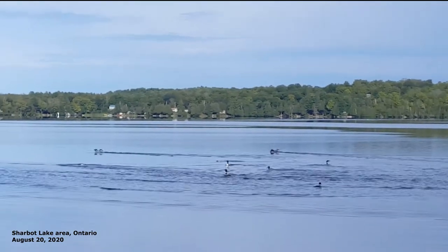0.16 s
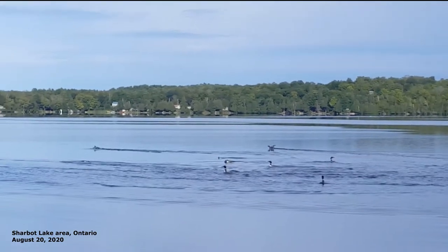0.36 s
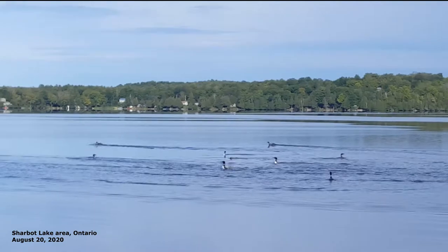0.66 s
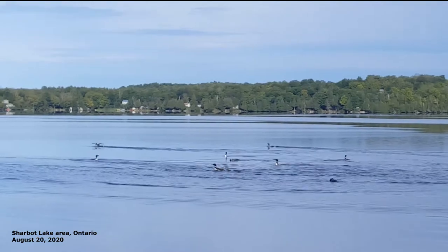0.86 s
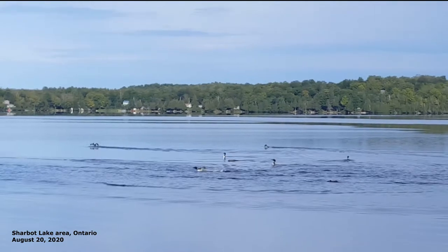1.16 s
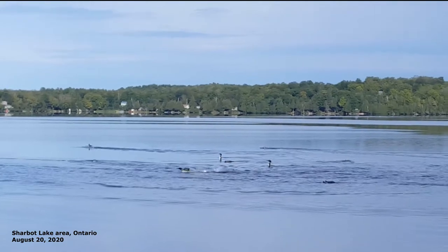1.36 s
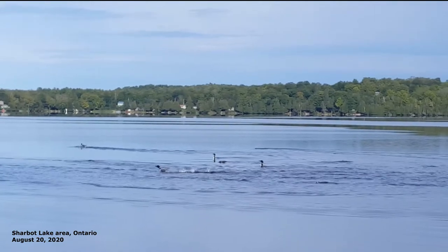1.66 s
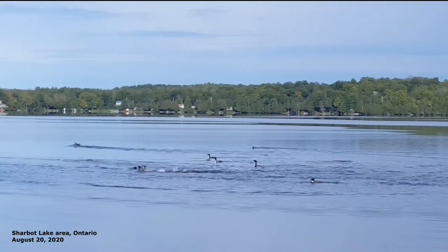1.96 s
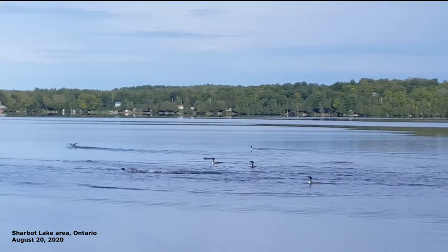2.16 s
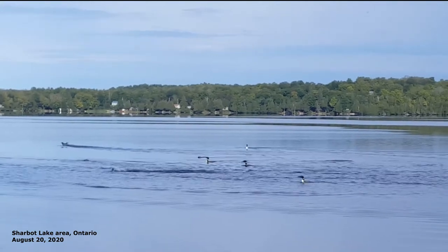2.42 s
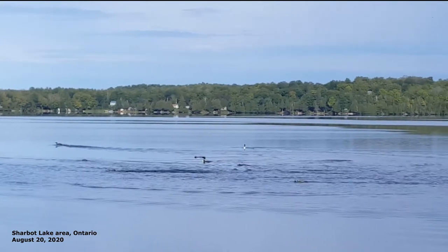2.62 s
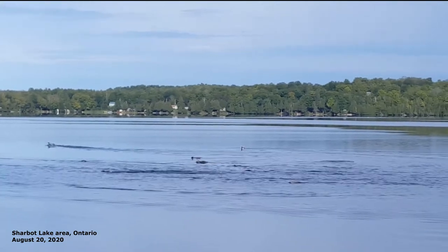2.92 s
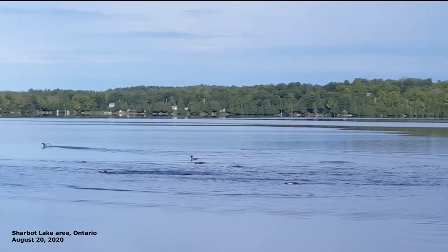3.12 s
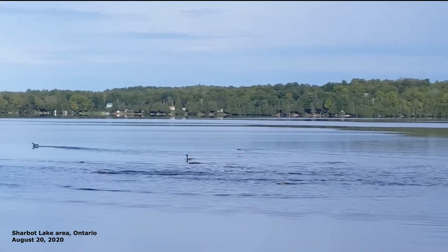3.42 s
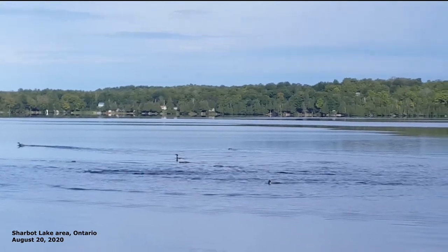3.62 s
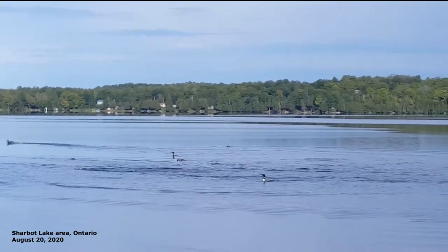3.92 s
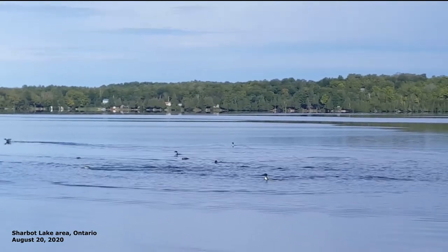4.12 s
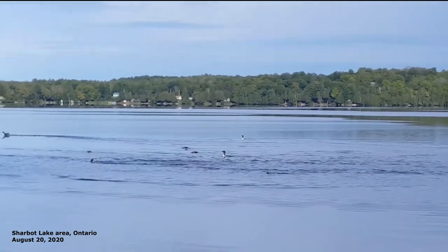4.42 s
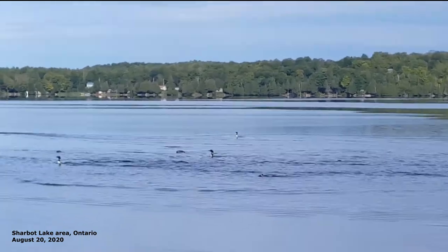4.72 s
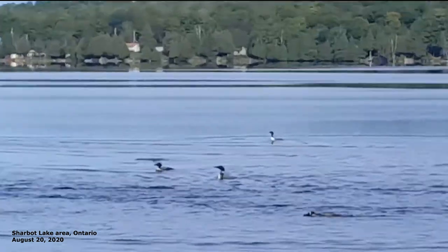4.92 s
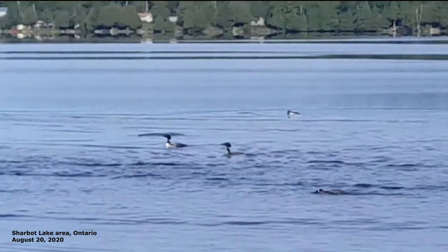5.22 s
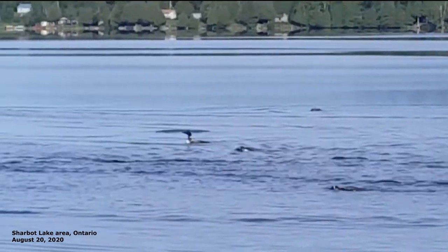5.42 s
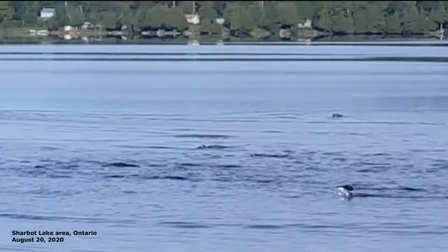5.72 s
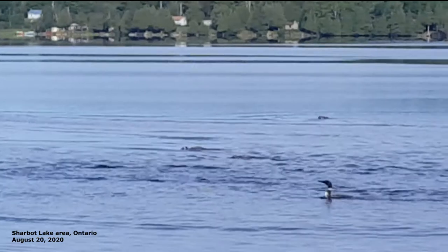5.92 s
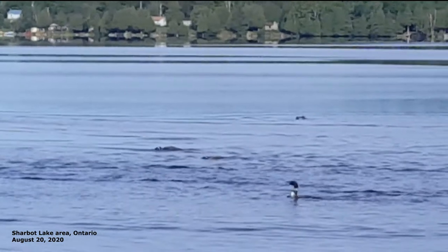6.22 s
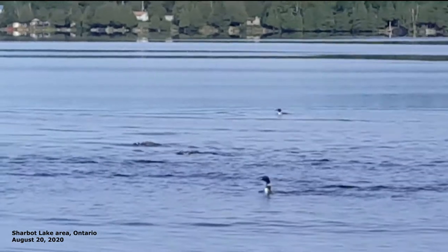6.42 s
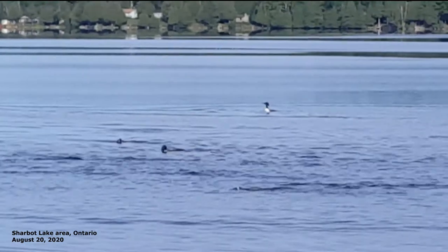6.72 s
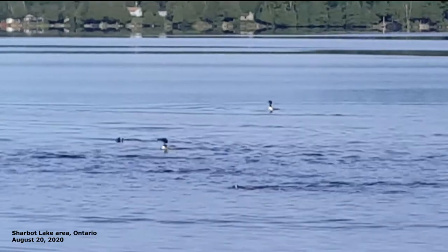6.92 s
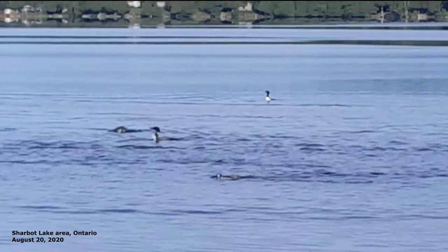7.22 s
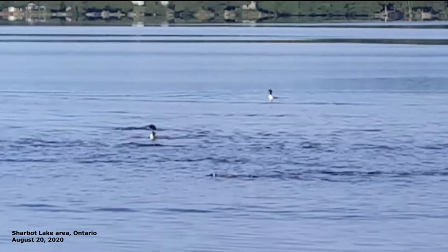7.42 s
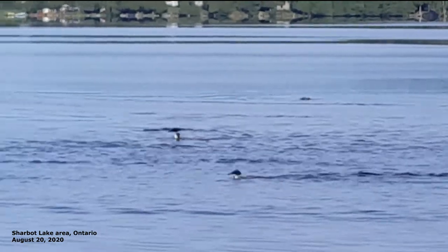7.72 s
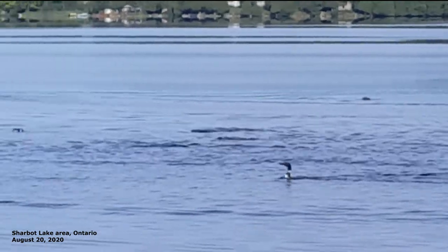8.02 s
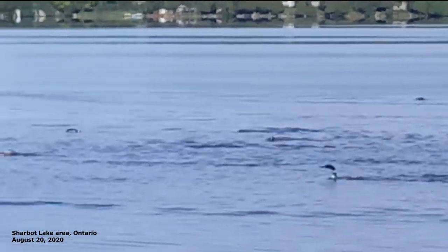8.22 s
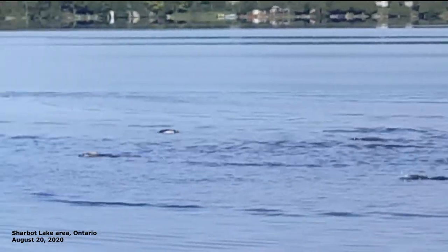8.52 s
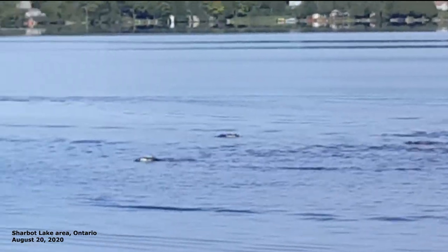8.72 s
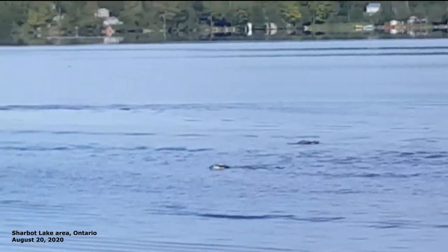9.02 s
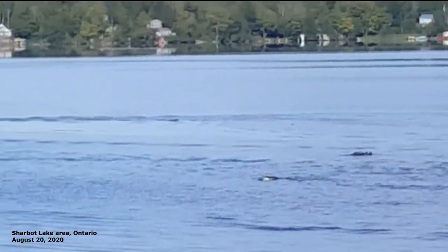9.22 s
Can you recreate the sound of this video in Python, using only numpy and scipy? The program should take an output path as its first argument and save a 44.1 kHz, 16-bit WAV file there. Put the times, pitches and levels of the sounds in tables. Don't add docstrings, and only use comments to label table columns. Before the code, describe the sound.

A group of loons trades rapid, yodel-like tremolo calls over open water, with short dark echoes, two small cloth ticks and a faint distant engine.

```python
import sys
import numpy as np
from scipy import signal
from scipy.fft import rfft, irfft, next_fast_len
from scipy.io import wavfile
from scipy.ndimage import uniform_filter1d, map_coordinates

SR = 44100
rng = np.random.default_rng(int(sys.argv[2]) if len(sys.argv) > 2 else 0)


def unload_wav(signal):
    wavfile.write(
        sys.argv[1],
        SR,
        np.round(np.clip(np.atleast_2d(signal).T, -1, 1) * 32767).astype(np.int16),
    )


def voltage_ratio(level):
    return 10 ** (np.asarray(level, float) / 20)


N = 412769


def unit(x):
    return x / np.sqrt(np.mean(x ** 2) + 1e-20)


def along(points, hz):
    f, v = np.transpose(points)
    return np.interp(np.log(hz + 1), np.log(f + 1), v)


def curves(rows, **outside):
    s, *cols = np.transpose(rows)
    return [np.interp(np.arange(N) / SR, s, c, **outside) for c in cols]


def wobble(rate):
    knots = rng.standard_normal(int(N * rate / SR) + 4)
    return map_coordinates(knots, [np.arange(N) * rate / SR])


def filtered(x, response):
    m = next_fast_len(N + SR // 2)
    return irfft(rfft(x, m) * response(np.fft.rfftfreq(m, 1 / SR)), m)[..., :N]


def panned(x, left_db):
    return np.array([x * voltage_ratio(left_db / 2), x * voltage_ratio(-left_db / 2)])


def add(track, s, sound):
    part = track[..., max(round(s * SR), 0):][..., :sound.shape[-1]]
    part += sound[..., :part.shape[-1]]


# first crest in seconds, last crest in seconds, first pitch in Hz, last pitch in Hz, level in dB.
WIDE_LAUGHS = [
    (1.87, 1.958, 1438, 1400, -29.5),
    (2.131, 2.321, 1338, 1289, -21),
    (2.245, 2.607, 1413, 1408, -33.5),
    (4.615, 4.896, 1215, 1232, -25),
    (4.778, 5.045, 1400, 1350, -40),
    (7.056, 7.43, 1251, 1301, -26.5),
    (7.864, 7.96, 1440, 1400, -38),
    (7.15, 7.43, 1190, 1130, -27),
]
EVEN_LAUGHS = [(.186, .451, 1400, 1383, -27.5), (8.354, 8.712, 1261, 1201, -25),
               (3.665, 3.76, 1330, 1300, -37), (.558, .65, 1225, 1260, -20.5),
               (.721, .885, 1100, 1065, -22.5), (.749, .852, 1504, 1502, -19),
               (1.119, 1.378, 1505, 1485, -19.5), (1.14, 1.41, 1340, 1310, -36.5),
               (1.775, 1.95, 1300, 1280, -29.5), (1.879, 1.96, 1084, 1122, -21),
               (2.728, 2.904, 1125, 1110, -23.5), (3.088, 3.285, 1280, 1270, -27.5),
               (3.392, 3.837, 1385, 1422, -31.5), (4.358, 4.655, 1260, 1297, -28),
               (4.65, 4.74, 1540, 1479, -24.5), (4.807, 4.979, 1126, 1054, -22.5),
               (6.115, 6.478, 1400, 1305, -34), (6.497, 6.697, 1145, 1129, -20.5),
               (7.583, 7.765, 1070, 1035, -23.5), (9.225, 9.35, 1234, 1165, -29)]
NARROW_LAUGHS = [
    (3.28, 3.395, 1518, 1474, -31),
    (6.059, 6.156, 1478, 1471, -26.5),
    (7.629, 7.733, 1498, 1500, -27.5),
    (8.838, 9.126, 1270, 1249, -29),
    (9.072, 9.231, 1415, 1441, -32),
    (2.465, 2.642, 1430, 1390, -41),
]
FLIPS = [
    3.287,
    4.657,
    .213,
    .89,
]


def laughs():
    warble_s = .093
    snap_s = .035
    rise_s, fall_s = .056, .05
    ends_db = 2.5
    breaks = [s for s, *_ in CLIMBS] + FLIPS
    rows = []
    for table, dip_hz in [(WIDE_LAUGHS, 287.3), (EVEN_LAUGHS, 206.94), (NARROW_LAUGHS, 136.5)]:
        for first, last, first_hz, last_hz, db in table:
            place = np.linspace(0, 1, round((last - first) / warble_s) + 1)
            crests = first + place * (last - first)
            hz = first_hz + place * (last_hz - first_hz)
            level_db = db - ends_db * (2 * place - 1) ** 2
            start = max([s for s in breaks if -snap_s / 4 < s - first < snap_s] + [first - rise_s])
            end = min([s for s in FLIPS if abs(s - last) < snap_s / 2] + [last + fall_s])
            rows.append((crests, hz, level_db, dip_hz, start, end, 0))
    return rows


# crest in seconds, pitch in Hz, level in dB, fall in seconds.
LONE = [(0.051, 1322, -36, 0.095), (.535, 1263, -27.5, 0.034), (.435, 1280, -31, .05),
        (.744, 1235, -31, .05), (.897, 1340, -33, .026), (0.965, 1266, -26, 0.027),
        (.942, 1230, -28.5, 0.062), (1.029, 1257, -19.5, 0.13), (1.672, 1493, -42, 0.075),
        (1.806, 1495, -32.5, 0.054), (2.054, 1338, -23, 0.017), (3.017, 1320, -36, 0.079),
        (3.51, 1170, -37, .065), (3.588, 1335, -32, .025), (3.654, 1405, -30, .04), (5.14, 1270, -47, .035),
        (6.84, 1430, -55, .07), (3.936, 1313, -34, 0.062), (4.04, 1146, -42, .023),
        (4.99, 1144, -30, 0.045), (5.074, 999, -31, 0.046), (2.705, 1252, -40.5, 0.024),
        (0.349, 1530, -38.5, 0.024), (5.97, 1264, -25.5, 0.049), (6.265, 1246, -30, .12),
        (7.508, 1290, -29, .012), (7.532, 1250, -33, .05), (7.553, 1265, -32, .08),
        (7.844, 1230, -36, .085), (8.059, 1190, -48, 0.037), (9.355, 1408, -31, 0.012),
        (1.039, 1388, -31.5, 0.024), (8.258, 1143, -29.5, 0.0028), (7.502, 1430, -40, .03)]
# crest in seconds, pitch in Hz, level in dB, rise
# in seconds, octave gain in dB.
HOOTS = [(.105, 900, -36, .032, -6), (.192, 985, -33, .048, 4), (.254, 810, -45.5, .03, .1),
         (.9, 716, -45, .045, -5), (1.062, 730, -37, .035, -10), (1.575, 800, -50, .03, -4),
         (1.695, 945, -33, .045, .1), (1.81, 736, -36.5, .045, -3), (2.037, 896, -32.5, .04, 4),
         (2.15, 983, -26, .045, -8), (2.225, 608, -44, .025, -8), (2.4, 724, -46, .025, -8),
         (3.0, 843, -43, .04, 2.5), (3.305, 908, -39, .035, -2.5), (3.494, 900, -43, .045, 2.5),
         (4.275, 808, -46.5, .045, .1), (4.609, 883, -45, .035, -9), (4.738, 770, -38, .045, -6),
         (5.878, 882, -34.5, .045, .1), (6.115, 930, -37, .04, .1), (6.42, 730, -37, .045, 2.5),
         (6.968, 810, -43, .04, 4), (7.068, 874, -40, .03, -3), (7.35, 842, -42.5, .045, 2.5),
         (7.508, 715, -39, .015, -6),
         (7.87, 643, -37.5, .038, -8), (8.19, 851, -38, .045, 2.5), (8.28, 878, -32, .033, .1),
              (8.765, 1010, -40, .03, -12), (.955, 700, -42, .025, -6), (.145, 750, -48, .03, -4),
              (2.225, 915, -46, .03, 3), (5.79, 745, -50, .045, .1), (6.365, 1035, -36, .045, -8),
              (1.948, 842, -42, .022, .1), (8.983, 900, -43.5, .045, .1), (9.296, 852, -34.5, .045, .1),
              (3.588, 720, -50, .018, -6), (3.535, 890, -50, .022, 8), (4.76, 925, -52, .03, 8)]
# break in seconds, top pitch in Hz, level in dB, octave gain in dB.
CLIMBS = [(.333, 957, -38, 2.5), (.485, 800, -43, 9), (.734, 804, -36, 4), (1.658, 962, -37.5, -3),
          (2.747, 818, -39, 4), (3.085, 930, -41, 3), (3.39, 1038, -40, 8), (4.353, 940, -39, 5),
          (4.638, 819, -44, 9), (4.714, 948, -38, 8), (6.168, 981, -43, -3), (6.505, 865, -32, 7),
          (7.049, 900, -43, 8), (7.432, 941, -35, 3), (7.597, 812, -38, 8), (8.842, 904, -37.5, .1),
          (.957, 1000, -41, 6)]


def single_calls():
    rise_s, hoot_end_s = .056, .034
    climb_s, break_s = .062, .003
    aim_s, aim_hz = .011, 28
    rows = []
    for s, hz, db, fall in LONE:
        rows.append(([s], [hz], [db], 169.2, s - rise_s, s + fall, 0))
    for s, hz, db, rise, octave_db in HOOTS:
        rows.append(([s], [hz], [db], 84.9, s - rise, s + hoot_end_s, octave_db))
    for s, hz, db, octave_db in CLIMBS:
        rows.append(([s + aim_s], [hz + aim_hz], [db + 2], 168.5, s - climb_s, s + break_s, octave_db))
    return rows


# crest in seconds, pitch
# in Hz, level in dB, gain of octave and third partial in dB, gain of upper overtones in dB.
ACCENTS = [(.19, 1400, 2.5, .1, 9), (.274, 1395, -1.5, .1, 9), (.362, 1390, 3, -3, 13),
           (.451, 1383, 1.5, -3, 14), (.558, 1225, .1, -3, 4), (.65, 1260, 7, -5, 5),
           (.749, 1504, 3.5, .1, .1), (2.904, 1110, 1.5, -2.5, -6), (4.74, 1479, -4, .1, .1),
           (.803, 1082, .1, 5, -5), (.885, 1065, .1, .1, -6), (.852, 1502, 2.5, .1, 14),
           (1.029, 1257, -1.5, -4, .1), (1.119, 1505, 1.5, .1, .1), (1.29, 1492, 1.5, .1, .1),
           (1.378, 1485, 1.5, .1, .1), (1.775, 1300, -4, -6, .1), (1.879, 1084, 2.5, 3, 3),
           (1.96, 1122, -1.5, -3, 3), (2.054, 1338, -1.5, 4, 6), (2.131, 1338, 2.5, 4, 4),
           (2.226, 1313, -1.5, 3, .1), (2.816, 1118, -1.5, -2.5, -6), (3.187, 1275, -4, -4, .1),
           (3.285, 1270, -3, -4, .1), (4.358, 1260, -1.5, -8, .1), (3.395, 1474, -8, .1, .1),
           (3.57, 1400, -2.5, 3, .1), (3.481, 1392, -3, .1, .1), (3.837, 1422, -1.5, .1, .1),
           (4.457, 1272, -1.5, -8, .1), (4.556, 1285, -.6, -8, .1), (4.979, 1054, -1.5, -3, -8),
           (5.074, 999, 2.5, -10, -8), (4.807, 1126, 1.5, .1, .1), (4.893, 1090, 1.5, -2.5, -6),
           (6.265, 1246, .1, -12, .1), (6.205, 1375, .1, -3, .1), (6.295, 1350, 3, -5, .1),
                (6.115, 1400, .1, -3, .1), (6.387, 1329, .1, -5, .1), (6.497, 1145, .1, -4, .1),
                (6.597, 1137, 1.5, -2.5, 3), (6.697, 1129, -1.5, -2.5, -2.5), (6.522, 915, .1, .1, 10),
                (7.15, 1263, 3, -7, .1), (7.056, 1251, .1, -8, .1), (7.15, 1190, .1, -9, .1),
                (7.243, 1170, .1, -9, .1), (7.337, 1150, .1, -8, .1), (7.43, 1130, -5, -5, .1),
                (7.614, 862, .1, .1, 14), (7.674, 1052, .1, -7, 6), (7.765, 1035, 1.5, -6, 7),
                (7.629, 1498, -3, .1, .1), (7.733, 1500, -4, .1, .1), (7.96, 1400, -5, .1, .1),
                (8.838, 1270, .1, -8, .1), (8.934, 1263, -2.5, -9, .1), (9.03, 1256, 1.5, -9, .1),
                (9.126, 1249, .1, -9, .1), (9.225, 1234, -3, -9, .1), (8.354, 1261, .1, 6, .1),
                (8.443, 1246, -1.5, 4, .1), (8.533, 1231, -1.5, 4, .1), (8.622, 1216, 1.5, 4, .1),
                (8.712, 1201, 1.5, 3, .1), (8.28, 878, .1, .1, 5), (2.426, 1410, 1.5, .1, .1),
                (2.516, 1409, 1.5, .1, .1), (3.748, 1415, -1.5, .1, .1)]


def accents(crests, hz):
    rows = np.array(ACCENTS)
    same_time = np.abs(rows[:, 0] - np.c_[crests]) < .025
    same_pitch = np.abs(rows[:, 1] - np.c_[hz]) < 45
    return ((same_time & same_pitch) @ rows[:, 2:]).T


# from in seconds, to in seconds, lowest pitch in Hz,
# highest pitch in Hz, overtone gain in dB.
FACING = [(.2, .47, 1330, 1450, 3), (.45, .92, 600, 1150, 5), (1.2, 1.35, 1280, 1400, 10),
          (1.9, 2.1, 800, 920, 10), (2.68, 2.95, 600, 1150, 7), (4.78, 5.0, 1000, 1150, 4),
          (4.85, 5.0, 1330, 1450, 8), (6.1, 6.4, 1330, 1450, 15), (6.38, 6.75, 600, 1180, 17),
          (7.1, 7.4, 1230, 1330, 6), (8.4, 8.6, 1230, 1330, 5)]


def facing(s, hz):
    return sum(gain for start, end, low, high, gain in FACING if start < s < end and low < hz < high)


# crest pitch in Hz,
# octave in dB, third partial in dB, upper overtones in dB.
COLOUR = [(800, 1.5, -18, -13.5), (900, -5.5, -26.5, -6.5), (1015, -24, -39, 2), (1100, -28.5, -36.5, -5.5),
          (1180, -30, -37.5, -19), (1280, -37, -39, -19), (1400, -29, -40, -27),
          (1500, -46.5, -47.5, -35.5)]
# multiple of the pitch, level in dB.
REED = [(4, -28), (5, -34), (6, -34), (7, -42), (8, -44)]
# until in seconds, rate in Hz, sideband level in dB.
BURR = (8.575, 280, -15)


def sing(call, turn, flutter):
    crests, hz, db, dip_hz, first, last, chest_db = call
    fade_s = .012
    t = np.arange(max(first - fade_s / 2, 0), last + fade_s / 2, 1 / SR)
    half_s = np.ptp(crests) / (len(crests) - 1) / 2 if len(crests) > 1 else .046
    chest = hz[0] <= 990
    hollow = 1200 < hz[0] < 1330
    shrill = hz[0] > 1480

    u = np.abs(t[:, None] - crests).min(axis=1) / half_s
    sunk = np.where(u < 1, (1 - np.cos(2.4 * u)) / (1 - np.cos(2.4)), 1 + .9 * (u - 1))
    drift, shimmer = np.roll(flutter, round(turn * SR), axis=1)[:, :len(t)]
    crest_hz = np.interp(t, crests, hz)
    pitch_hz = crest_hz + 7.67 * drift - dip_hz * uniform_filter1d(sunk, size=300)
    phase = 2 * np.pi * np.cumsum(pitch_hz) / SR + 4 * turn

    push_db, open_db, reed_db = (np.interp(t, crests, a) for a in accents(crests, hz))
    sag_db = (9 + 8 * shrill) * sunk ** 1.52
    level_db = np.interp(t, crests, db) + push_db - sag_db + 2.1 * shimmer
    strain_db = .07 * np.minimum(level_db + 25, 0)
    facing_db = facing(np.mean(crests), hz[0])

    octave_db, third_db, upper_db = (np.interp(crest_hz, [row[0] for row in COLOUR], column)
                                     for column in np.transpose(COLOUR)[1:])
    octave_facing = -.7 if hollow else .55 if chest else 1
    octave_db = octave_db + facing_db * octave_facing + chest_db + open_db + 2.5 * drift - 3 * sunk
    third_facing = hollow + .6 * (hz[0] < 990)
    third_db = third_db + open_db + strain_db + third_facing * facing_db + 3 * drift - 4.9 * sunk
    upper_db = upper_db + reed_db + strain_db + .45 * facing_db - 3 + 3 * drift - 15 * sunk

    note = np.sin(phase) + voltage_ratio(octave_db) * np.sin(2 * phase + 1)
    note += voltage_ratio(third_db) * np.sin(3 * phase)
    note += voltage_ratio(upper_db) * sum(voltage_ratio(part_db) * np.sin(k * phase) for k, part_db in REED)

    until_s, burr_hz, burr_db = BURR
    if len(crests) > 1 and crests[0] < until_s < crests[-1]:
        split = 4 * note - 3 * np.sin(phase)
        depth = 2 * voltage_ratio(burr_db - 10 * sunk) * np.clip((until_s - t) / fade_s, 0, 1)
        note += split * depth * np.cos(2 * np.pi * burr_hz * t)
    edges = np.clip(np.minimum(t - t[0], t[-1] - t) / fade_s, 0, 1)
    return t[0], np.sqrt(2) * voltage_ratio(level_db) * np.sin(np.pi * edges / 2) ** 2 * note


# frequency in Hz, left lead in radians, left-right level in dB.
PORTS = [(300, 0, -.4), (800, .4, -.4), (1380, 1.1, .1), (2300, .1, 2.5), (4500, 0, 2.5)]
# time in seconds, left-right level in dB.
SIDEWAYS = [(0, 4.5), (1.3, 4), (2.5, 5), (3.6, 4), (5, 2), (9.4, 2.5)]


def loons():
    voices = np.zeros((2, N))
    flutter = np.array([wobble(40), wobble(40)])
    chance = rng.standard_normal(size=(200, 2))
    for call, (turn, spot) in zip(laughs() + single_calls(), chance):
        start, sound = sing(call, turn, flutter)
        pair = panned(sound, .8 * spot)
        pair[1] = np.roll(pair[1], round(4 * spot))
        add(voices, start, pair)

    ports = np.array(PORTS)

    def port_response(hz):
        lead = np.array([[.5j], [-.5j]]) * along(ports[:, :2], hz)
        return np.exp(lead) * panned(1, along(ports[:, ::2], hz))

    return filtered(voices, port_response) * panned(np.ones(N), curves(SIDEWAYS)[0])


def bill_rasp(birds):
    hiss = np.abs(birds) * rng.standard_normal(N)
    return voltage_ratio(-29) * filtered(hiss, lambda hz: (hz > 1600) / (1 + (hz / 4000) ** 4))


# frequency in Hz, time to die by 60 dB in seconds.
SHORE = [(500, 0.59), (1400, 0.66), (4000, 0.1)]


def shore(x, gap_s=.05, echo_db=-20.5):
    hz, t, z = signal.stft(rng.standard_normal((2, SR)), SR, nperseg=256)
    decay = voltage_ratio(-60 * t / along(SHORE, hz)[:, None])
    tail = signal.istft(z * decay, SR, nperseg=256)[1]
    late = np.pad(x, ((0, 0), (round(gap_s * SR), 0)))
    return voltage_ratio(echo_db) * signal.fftconvolve(late, tail / np.linalg.norm(tail[0]), axes=1)[:, :N]


# time in seconds, level in dB.
BRUSH = [
    [(3.618, -55), (3.64, -35), (3.7, -36), (3.76, -42), (3.782, -53.5)],
    [(3.885, -56), (3.9, -50)],
    [(5.805, -44.5), (5.82, -57), (5.862, -48)],
]
# time in seconds, peak in dB, left-right level in dB.
TICKS = [
    (3.6545, -20, 24),
    (3.9002, -22, 16.5),
    (5.8465, -48, 16.5),
    (3.886, -50, 12),
    (3.873, -55, 12),
    (.058, -52, 4),
]
# frequency in Hz, level in dB per Hz.
CLOTH = [(940, -57), (1600, -40), (1730, -17), (4000, -17), (5700, -2), (9500, -30), (12700, -30),
         (15700, -55)]


def cloth():
    drag = sum(voltage_ratio(curves(stroke, left=-150, right=-150)[0]) for stroke in BRUSH)
    noise = filtered(rng.standard_normal((2, N)), lambda hz: voltage_ratio(along(CLOTH, hz)))
    grit = voltage_ratio(wobble(200)) * unit(noise)
    rub = uniform_filter1d(drag, size=200) * grit * voltage_ratio([[5], [-9]])
    t = np.arange(SR // 100) / SR
    for s, db, left_db in TICKS:
        snap = 0.6 * uniform_filter1d(rng.standard_normal(len(t)), size=3)
        snap += np.sin(2 * np.pi * 5600 * t) + 0.55 * np.sin(2 * np.pi * 2400 * t)
        envelope = voltage_ratio(db + 4.0 - 60 * t / 0.006) * (1 - np.exp(-t / .0003))
        add(rub, s, panned(envelope * snap, left_db))
    return rub


# time in seconds, peak in dB, pitch in Hz.
PLOPS = [
    (1.455, -55, 500),
    (1.487, -54, 485),
    (3.979, -63, 470),
    (4.049, -59, 570),
    (4.598, -58, 420),
    (5.373, -66, 624),
    (4.115, -61.5, 590),
    (5.065, -56.5, 610),
]


def ripples(cycles=9, glide=0.18, count=160):
    water = np.zeros(N)
    u = rng.random((count, 3))
    faint = np.c_[u[:, 0] * N / SR, -68 - 2 * np.log(u[:, 1] + .03), 430 * 2 ** u[:, 2]]
    for s, db, hz in [*PLOPS, *faint]:
        t = np.arange(int(SR * cycles * 2 / hz)) / SR
        life = t * hz / cycles
        envelope = voltage_ratio(db + 19 - 23 * life) * (1 - np.exp(-t / 0.001))
        add(water, s, envelope * np.sin(2 * np.pi * hz * t * (1 + glide * life / 2)))
    return panned(water, left_db=1.0)


# frequency in Hz, width in Hz, level in dB.
WING = [(5450, 700, 0), (6500, 900, -9)]


def insect(rate_hz=67.9, sharpness=2.6):
    turns = np.cumsum(rate_hz * (1 + 0.0041 * wobble(1.3))) / SR
    stroke_hz = WING[0][0] - 800 * (turns % 1 - .5) + 90 * wobble(60)
    stroke = np.sin(2 * np.pi * np.cumsum(stroke_hz) / SR)
    rasps = np.abs(np.sin(np.pi * turns)) ** sharpness * (rng.standard_normal(N) + 0.7 * stroke)

    def ring(f):
        return sum(voltage_ratio(db) * 1j * f * w / (c * c - f * f + 1j * f * w) for c, w, db in WING) ** 2

    return panned(voltage_ratio(-66 + 0.68 * wobble(3.0)) * unit(filtered(rasps, ring)), left_db=14.5)


# time in seconds, drone pitch in Hz, level in dB.
BOAT = [(0, 153, -58.5), (2.3, 152, -58.5), (4.2, 147.4, -59), (5.9, 133.8, -63), (7.5, 119.8, -70),
        (9.4, 116.5, -88.5)]


def boat():
    hz, db = curves(BOAT)
    phase = 2 * np.pi * np.cumsum(hz * (1 + 0.0073 * wobble(9.7))) / SR
    drone = voltage_ratio(2.6 * wobble(18)) * np.sin(phase)
    drone += voltage_ratio(-8.5 + 1.6 * wobble(4)) * np.sin(1.5 * phase)
    return panned(voltage_ratio(db + 0.5) * drone, left_db=2.5)


# frequency in Hz, level in dB per Hz.
AIR = [(25, -28.5), (100, -12), (220, -16.5), (360, -23.5), (600, -20), (1400, -17), (2600, -28),
       (3600, -41.5), (5500, -26.5), (7000, -38), (8500, -46), (10500, -47), (13000, -44.5), (15700, -40)]
# frequency in Hz, left-right likeness from 0 to 1.
ALIKE = [(60, 0.95), (200, 0.8), (640, 0.64), (1400, 0)]
# frequency in Hz, left-right level in dB.
LEAN = [(200, 1.5), (1300, 5), (5000, 6.5), (15000, 2)]
# time in seconds, level in dB.
STIR = [(0, 3.5), (2, 6), (4, -1.5), (5.5, -5), (7.3, 2.5), (9.4, 0)]


def air(patchy_db=1.9):
    z = signal.stft(rng.standard_normal((2, N)), nperseg=512)[2]
    field = uniform_filter1d(rng.standard_normal(z.shape[1:]), 6, 0)
    field = unit(uniform_filter1d(field, 14, 1))
    steadier_bass = np.clip(np.arange(len(field)) / 5, .3, 1)[:, None]
    pair = signal.istft(z * voltage_ratio(patchy_db * field * steadier_bass), nperseg=512)[1][:, :N]

    def mid_side(hz):
        turn = np.arccos(np.clip(along(ALIKE, hz), -1, 1)) / 2
        return voltage_ratio(along(AIR, hz)) * [np.cos(turn), np.sin(turn)]

    mid, side = filtered(pair, mid_side)
    stereo = np.array([mid + side, mid - side])
    bed = voltage_ratio(-50.5) * unit(filtered(stereo, lambda hz: panned(1, along(LEAN, hz))))
    water = filtered(bed, lambda hz: (hz > 280) & (hz < 7500))
    return bed + (voltage_ratio(curves(STIR)[0]) - 1) * water


def scene():
    birds = loons()
    birds = birds + bill_rasp(birds)
    return birds + shore(birds) + cloth() + ripples() + insect() + boat() + air()


def top_cut(x):
    return signal.sosfilt(signal.butter(12, 16800, fs=SR, output="sos"), x)


def record(dry):
    mix = filtered(dry, lambda hz: hz < 15760)
    return top_cut(mix)


dry = scene()
out = record(dry)
unload_wav(out)
```